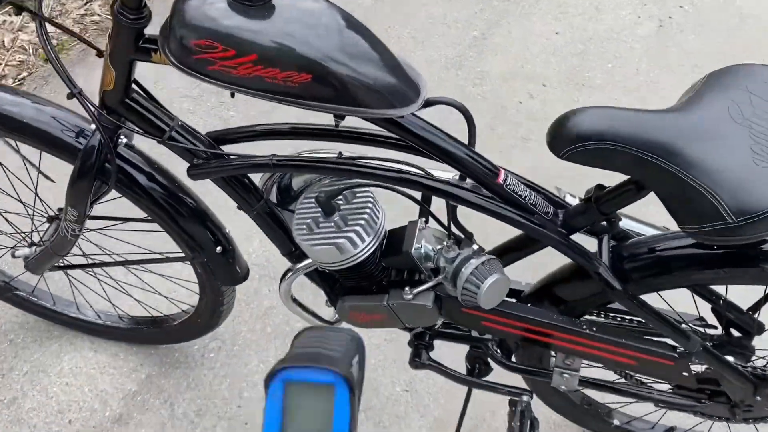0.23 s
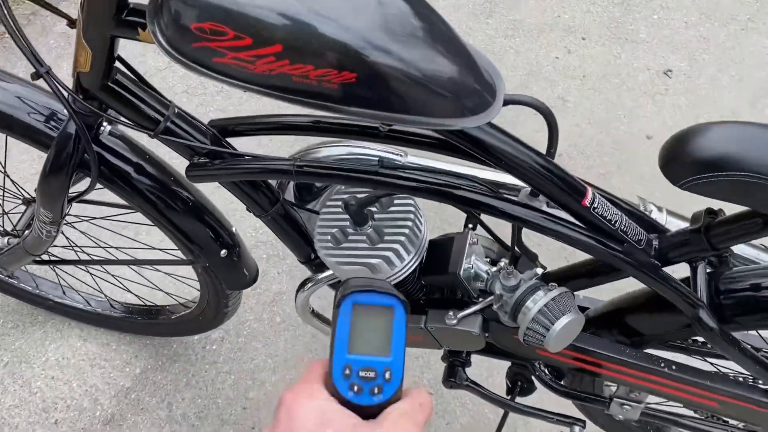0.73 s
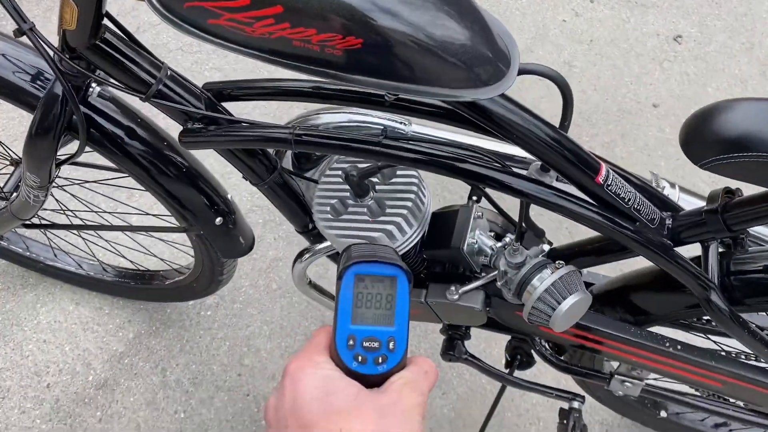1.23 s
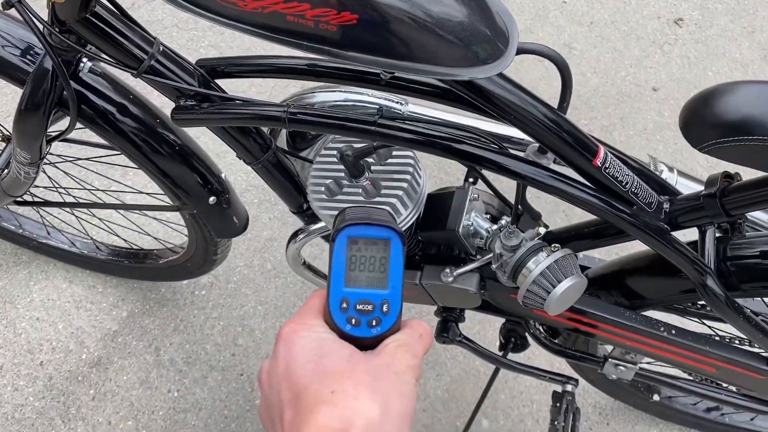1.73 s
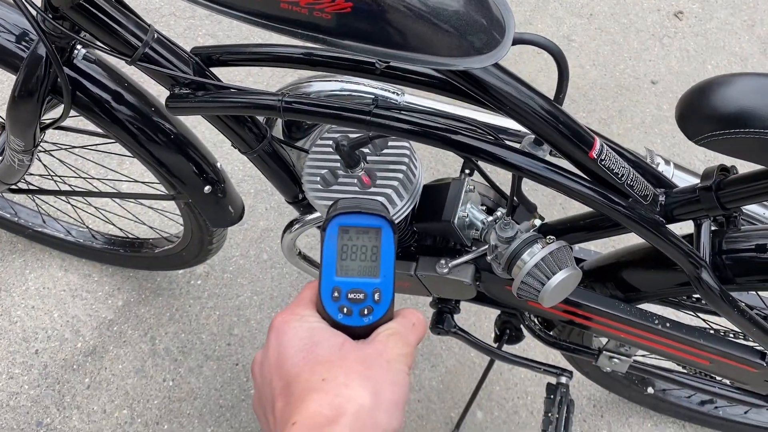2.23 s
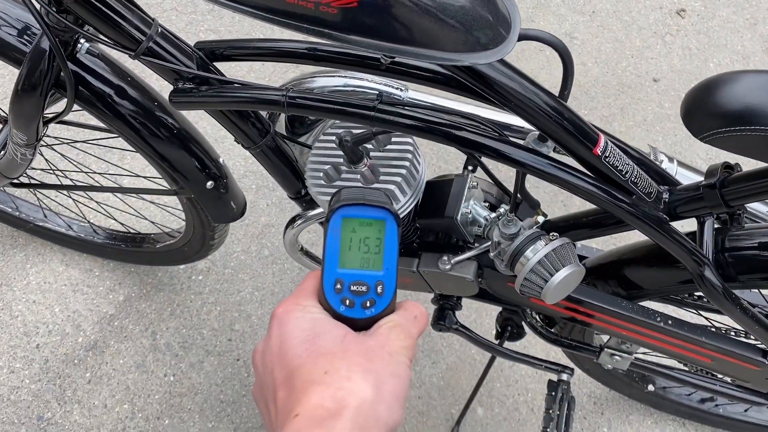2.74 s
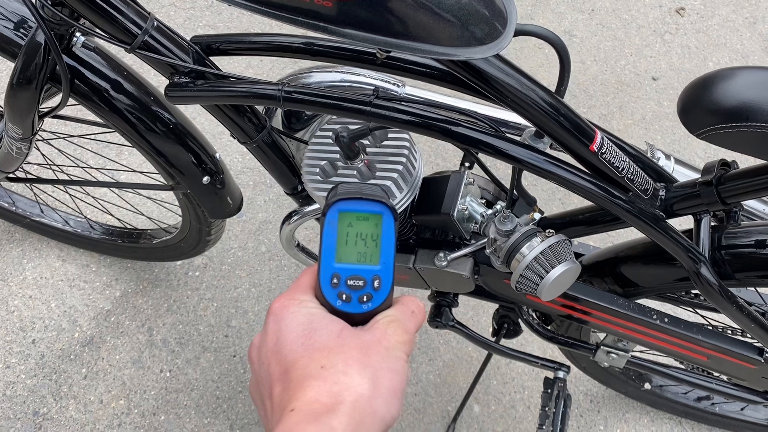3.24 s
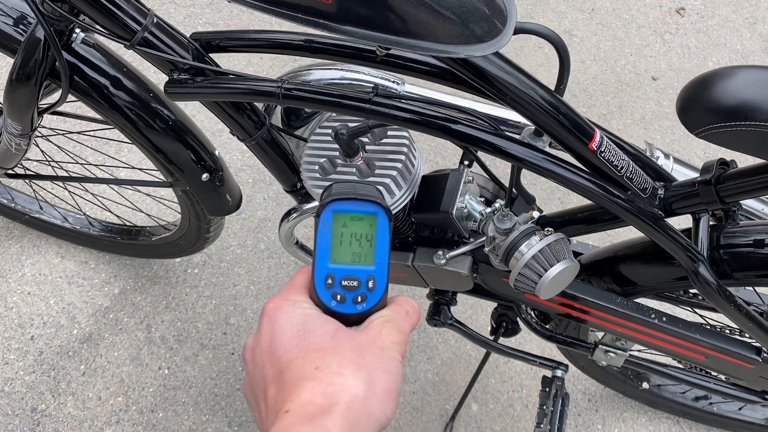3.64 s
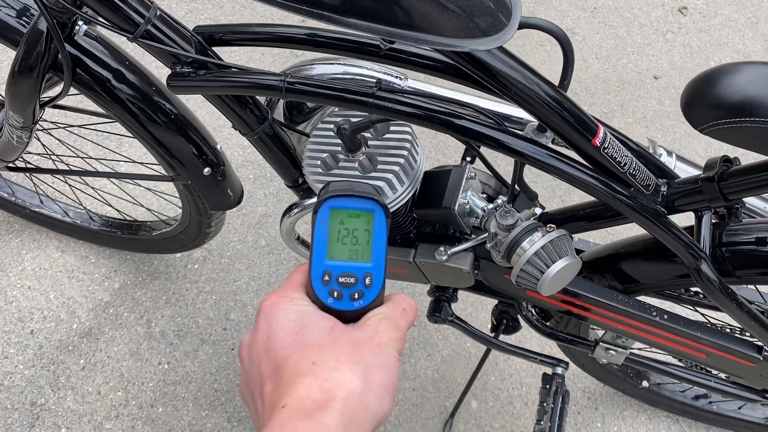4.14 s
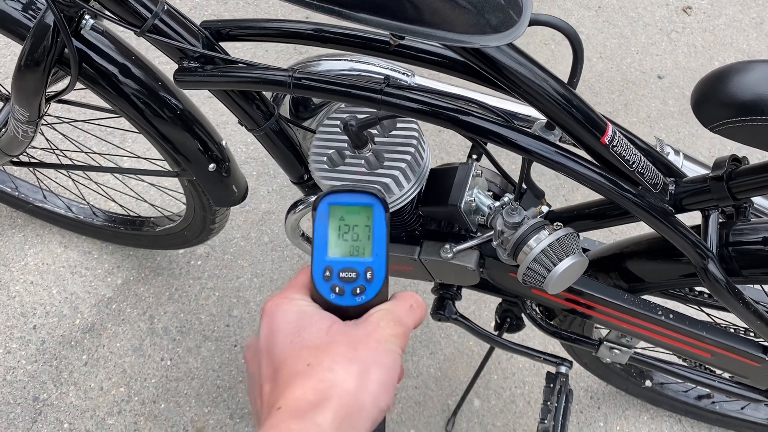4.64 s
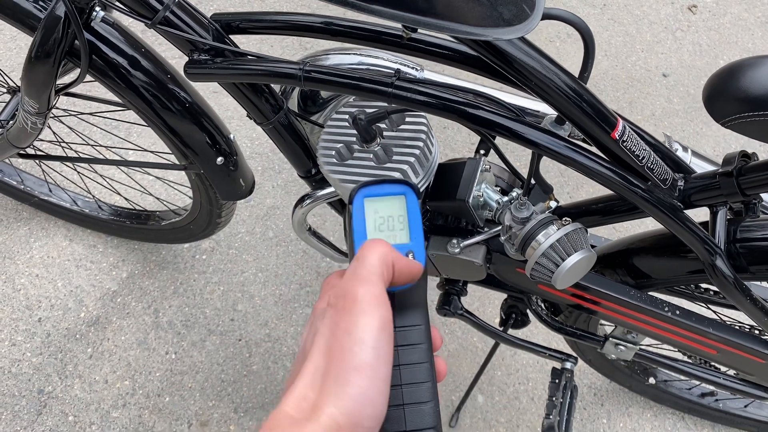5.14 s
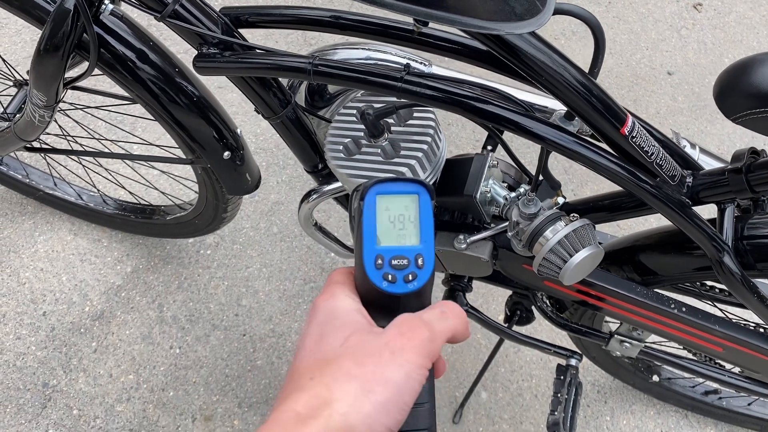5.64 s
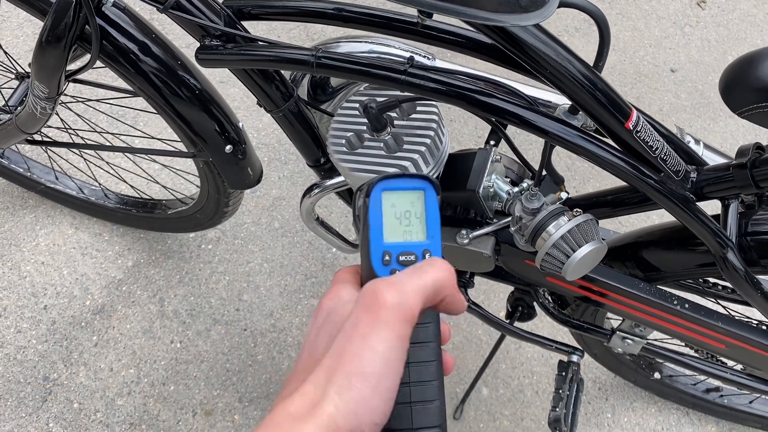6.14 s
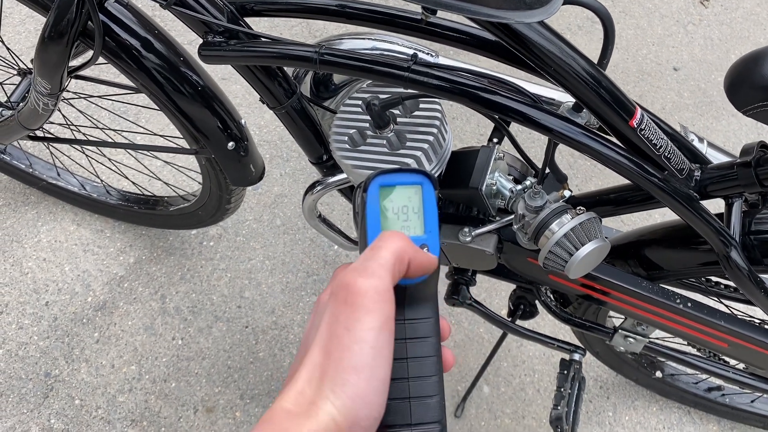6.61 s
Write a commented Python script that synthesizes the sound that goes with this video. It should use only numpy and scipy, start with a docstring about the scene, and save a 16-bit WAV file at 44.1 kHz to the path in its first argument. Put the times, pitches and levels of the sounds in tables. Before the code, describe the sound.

A small two-stroke bicycle engine idles close by outdoors, with a rapid pulsing beat, sputtering exhaust pops and metallic rattle.

```python
"""On a concrete drive, a small two-stroke bicycle engine idles about a metre away.
The crank turns some 52 times a second, but the cylinder fires in bursts, mostly of two to four,
then coasts. Every turn pumps air through the resonant muffler and intake and rattles the finned barrel.
A firing also knocks, cracks out of the exhaust port, rings the pipe and hisses.
A thin panel hums now and then, and nearby surfaces return brief reflections."""
import sys
import numpy as np
from scipy import signal
from scipy.fft import rfft, irfft
from scipy.io import wavfile
from scipy.ndimage import uniform_filter1d

SR = 44100
rng = np.random.default_rng(int(sys.argv[2]) if len(sys.argv) > 2 else 0)


def put_to_file(sound):
    """Save the sound as 16-bit audio at rate SR, in the file named by the first command-line argument."""
    columns = np.atleast_2d(sound).T  # one column per channel
    safe = np.clip(columns, -1, 1)
    whole_steps = np.round(safe * 32767)
    wavfile.write(sys.argv[1], SR, whole_steps.astype(np.int16))


N = 302967
HZ = np.fft.rfftfreq(N, 1 / SR)


def firings(slow_turn_s=.02, quick_turn_s=.0188, falloff_db=12):
    """Intermittent combustion: each burst builds to a crest, which kicks the crank faster, then fades."""
    # Bursts of firings on successive turns. Each row: start in seconds, number of firings,
    # crest in turns after the first firing, relative level of the strongest pop in dB.
    bursts = [(.021, 5, 1.3, -2.8), (0.154, 4, 0.51, -4), (0.2887, 4, 1.3, -2), (0.4417, 3, 1.03, 0),
              (.592, 3, .6, -1), (0.705, 3, 1.8, 0.2), (.859, 3, 1.03, -0.2), (.991, 4, 0.95, -1),
              (1.122, 3, 1.2, -0.6), (1.255, 2, 0.7, -0.5), (1.386, 3, 0.64, -0.9), (1.517, 2, 0.54, -2),
              (1.6495, 3, 0.28, 0.5), (1.78, 2, 0.74, -1), (1.893, 2, 1.2, -0.1), (2.026, 4, 0.38, -0.7),
              (2.156, 4, 1.15, 0), (2.305, 2, 0.66, -1.5), (2.4187, 3, 1.67, .1), (2.593, 2, 0.12, 1),
              (2.7075, 2, 0.84, .1), (2.8465, 2, 0.6, -0.5), (2.966, 2, 0.77, -1), (3.0445, 4, 1.4, -3.5),
              (3.1818, 3, 0.5, -1.5), (3.296, 3, 1.65, -.5), (3.4502, 2, 0.75, -0.5), (3.566, 2, 0.8, 0),
              (3.701, 2, 0.73, 0.7), (3.8166, 4, 1.25, -0.5), (3.966, 2, 1.2, 0.5), (4.08, 2, 0.85, 1),
              (4.2131, 2, 0.62, -0.5), (4.3257, 5, .95, -0.6), (4.457, 3, 1.53, -1.5),
              (4.6095, 2, 0.73, .5), (4.723, 3, 1.25, -0.5), (4.855, 2, 1.2, 1), (4.986, 2, 1.2, 1.5),
              (5.1171, 2, 0.84, 1), (5.2315, 3, 1.9, -0.2), (5.3662, 4, 1.08, 0), (5.5003, 3, 1.45, -0.7),
              (5.633, 3, 1.7, .5), (5.7881, 4, -.3, 1), (5.9217, 2, 1.5, -0.5), (6.0389, 3, 1.05, 0.1),
              (6.174, 2, 0.78, .5), (6.2906, 3, 0.77, .5), (6.408, 4, 1.4, -1.5), (6.5422, 2, 0.89, 1),
              (6.657, 3, 0.9, 0.5), (6.7924, 1, 3, 1.5)]
    rows = []
    for start, count, crest, top_db in bursts:
        past_crest = np.arange(count) - crest
        turn_s = np.interp(past_crest, [-.7, 0], [slow_turn_s, quick_turn_s])
        reach = np.where(past_crest < 0, .9, .35 * count)  # turns from the crest to half weakness
        weakness = past_crest ** 2 / (past_crest ** 2 + reach ** 2)
        pop_db = top_db - falloff_db * (weakness - weakness.min())
        # the knock grows faster than the pop, and is softer after the crest
        knock_db = -2.1 + 1.53 * pop_db - 4.5 * np.clip(past_crest, 0, 1)
        rows.append([start + np.cumsum(turn_s) - turn_s, pop_db, knock_db])
    return np.hstack(rows)


def crank(fired, turn_s=.019):
    """Coasting on inertia: the turns come quickly just after a burst and slow until the next."""
    marks = np.r_[fired[0] - 3 * turn_s, fired, fired[-1] + 4 * turn_s]
    turns = []
    for start, end in zip(marks[:-1], marks[1:]):
        count = max(1, round((end - start) / turn_s))
        share = np.linspace(0, 1, count, endpoint=False)
        turns.extend(start + (end - start) * (share - .055 * share * (1 - share)))
    return np.array(turns)


def exhaust(fired, pop_db):
    """Pipe resonance: a pressure front, steeper when strong, rings the modes; the bulk of gas follows."""
    # Modes of the pipe, of the port and header, and of the slow slug of gas leaving the muffler.
    # Each row: frequency in Hz, bandwidth in Hz, gain in dB, polarity.
    pipe_modes = [(423, 68, -19.5, -1), (762, 10, -32.5, -1), (856.4, 31.4, -11.5, 1), (924, 24, -24.5, 1),
                  (1224, 11.5, -27.5, 1), (1409, 72, -16, 1), (1677, 19, -24, 1), (1800, 100, -32, 1)]
    port_modes = [(634, 38, -25, -1), (2500, 88, -20, 1), (3160, 220, -16, 1)]
    slug_modes = [(74, 9.5, -26.5, 1), (102.8, 29.6, -21.5, 1), (130, 110, -26.5, 1)]
    pop = ring(fired, pop_db, pipe_modes, detune=.015, scatter_db=2, sag=.06)
    crack = ring(fired, 1.9 * pop_db, port_modes, detune=.0076, scatter_db=3, size=1200)
    half_turn_later = fired + .0105
    thump = ring(half_turn_later, .6 * pop_db, slug_modes, detune=.015, scatter_db=1, size=5000)
    return pop + crack + thump


def pumping(turns):
    """Cavity resonance: fired or not, the piston puffs into the muffler, then gulps at the intake."""
    # Modes of the two cavities. Each row: frequency in Hz, bandwidth in Hz, gain in dB, polarity.
    muffler_modes = [(49.4, 21.4, -28.5, -1), (386.7, 76, -13.5, 1), (422.9, 53.2, -14.5, -1),
                     (514, 66, -33.5, 1), (852.5, 25, -33, 1), (1370, 45, -54, 1), (1740, 28, -37, 1)]
    intake_modes = [(102.3, 25, -27, 1), (161, 29, -40.5, 1), (198.8, 10.4, -37.5, 1),
                    (206, 24.5, -38.5, 1), (225, 49, -45.5, 1), (348, 9.3, -38.5, 1)]
    puff = ring(turns + .00091, 0, muffler_modes, detune=.017, scatter_db=1.4)
    gulp = ring(turns + .0072, 0, intake_modes, detune=.0055, scatter_db=2, size=5000)
    return puff + gulp


def clatter(turns):
    """Impact noise: rings, bearings and gear teeth tick, hardest as the piston rocks over at the top."""
    # Spectrum of the impacts. Each row: frequency in Hz, relative level in dB.
    spectrum = [(30, -9), (70, 11.5), (250, 3), (560, -1.5), (950, 4.5), (1600, 1), (2300, -3),
                (3400, -3.5), (4400, -6.5), (5200, -11), (7000, -10), (8200, -9), (11000, -12.5),
                (16000, -19)]
    revolutions = np.interp(np.arange(N) / SR, turns, np.arange(len(turns)))
    slap = undb(5.4 * rng.standard_normal(len(turns)))[revolutions.astype(int)]  # no two turns alike
    rocking = np.exp(.69 * (np.cos(2 * np.pi * (revolutions - .68)) - 1))
    load = 1 + .28 * slap * rocking
    ticks = rng.standard_normal(N) * (rng.random(N) < .25)
    ticks *= undb(1.57 * rng.exponential(size=N))
    return undb(-27) * barrel(load * ticks, spectrum)


def hiss(fired, knock_db, size=2400):
    """Impact and turbulence: combustion knocks on the barrel, then gas tears through the opening port."""
    # Envelope of the gas noise. Each row: time from the port opening in seconds, relative level in dB.
    blow = [(-.009, -35), (-.0065, -13.5), (-.002, -2), (0, -7), (.0035, -3), (.007, -9.5), (.013, -19),
            (.026, -21), (.04, -54)]
    # Spectrum of the gas noise. Each row: frequency in Hz, relative level in dB.
    spectrum = [(200, -3), (560, -4.5), (900, 2.5), (1700, 1.5), (2200, 1), (3300, 1), (4400, -2.5),
                (5200, -4.5), (6400, -6), (8200, -5.5), (11500, -7), (16000, -16.5)]
    seconds, db = np.transpose(blow)
    envelope = undb(np.interp(seconds[0] + np.arange(size) / SR, seconds, db))
    strength = place(fired + seconds[0], np.outer(undb(knock_db), envelope))
    gas = rng.standard_normal(N)
    flicker_db = 1.46 * np.repeat(rng.standard_normal(N // 16 + 1), 16)[:N]
    return undb(-29) * barrel(strength * gas * undb(flicker_db), spectrum)


def barrel(force, spectrum):
    """Structural radiation: the metal gives a broad spectrum with the fins ringing on top, at unit rms."""
    # Modes of the cooling fins and covers. Each row: frequency in Hz, bandwidth in Hz, gain in dB.
    fin_modes = [(1383, 95, 0.5), (1718, 31, 7.5), (2786, 18, 8), (3213, 11.5, 10), (3252, 24, 1),
                 (3398, 21, 8), (3500, 32, 5.5), (4030, 71, 4), (4494, 230, 2.5), (5470, 170, 5.5),
                 (6000, 120, -1), (6300, 100, 3), (6800, 34, 9.5)]
    fins = sum(undb(db) * 1j * HZ * width / (hz ** 2 - HZ ** 2 + 1j * HZ * width)
               for hz, width, db in fin_modes)
    radiated = irfft(rfft(force) * colour(spectrum) * (1 + undb(-1) * fins), N)
    return radiated / np.sqrt(np.mean(radiated ** 2))


def panel_hum(turns):
    """Forced vibration: a thin panel swells into resonance at four times the crank speed."""
    # Swells of the hum. Each row: time in seconds, rms level in dB.
    swells = [(0, -48.5), (2.6, -51), (2.85, -38), (3.15, -34), (3.35, -47.5), (5.9, -49), (6.1, -40),
              (6.4, -49), (6.6, -42)]
    t = np.arange(N) / SR
    revolutions = uniform_filter1d(np.interp(t, turns, np.arange(len(turns))), size=4000)
    amplitude = np.sqrt(2) * undb(np.interp(t, *np.transpose(swells)))
    return amplitude * np.sin(2 * np.pi * 4 * revolutions)


def reflections(sound, decay_s, size=3000):
    """Scattering: frame, tank and concrete smear the sound in time and leave its spectrum unchanged."""
    decay = undb(-60 * np.arange(size) / SR / decay_s)
    spray = rfft(rng.standard_normal(size) * decay, N)
    return irfft(rfft(sound) * spray / np.abs(spray), N)


def ring(times, db, modes, detune, scatter_db, sag=0, size=3600):
    """Modal superposition: each pulse rings damped modes, which gas temperature detunes together."""
    t, pulses = np.arange(size) / SR, 0
    chance = rng.standard_normal((len(times), len(modes) + 1))
    # with sag, a strong pulse starts flat and glides up as hot gas fills the pipe
    lag = sag * np.outer(undb(db), .0051 * (1 - np.exp(-t / .0045)))
    clock = np.outer(1 + detune * chance[:, -1], t) - lag
    for k, (hz, width, mode_db, polarity) in enumerate(modes):
        gain = polarity * undb(db + mode_db + scatter_db * chance[:, k])
        envelope = np.outer(gain, np.exp(-np.pi * width * t))
        pulses = pulses + envelope * np.cos(2 * np.pi * hz * clock)
    return place(times, pulses)


def place(times, sounds):
    """Linear superposition: one short sound starts at each time, and overlaps add."""
    track = np.zeros(N + 2 * SR)
    for seconds, sound in zip(times, sounds):
        start = SR + int(round(seconds * SR))
        track[start:start + len(sound)] += sound
    return track[SR:SR + N]


def colour(points):
    """Frequency response: the gain through (Hz, dB) points on a logarithmic frequency axis."""
    hz, db = np.transpose(points)
    return undb(np.interp(np.log(HZ + 1), np.log(hz), db))


def undb(db):
    """Amplitude ratio of a level in decibels."""
    return 10 ** (np.asarray(db) / 20)


def scene():
    """Source extent: pipe and intake sound from their openings; the metal radiates all over, so is wider."""
    # Stereo width. Each row: frequency in Hz, gain of the side signal in dB.
    width = [(60, -28), (300, -18.5), (750, -9), (1300, -8.5), (3000, -6.5), (6500, -4), (8500, -47),
             (16000, -13)]
    fired, pop_db, knock_db = firings()
    turns = crank(fired)
    tones = pumping(turns) + exhaust(fired, pop_db) + panel_hum(turns)
    facing, flanks = (hiss(fired, knock_db) + clatter(turns) for _ in range(2))
    indirect = reflections(tones, decay_s=.049) + flanks
    side = irfft(rfft(indirect) * colour(width), N)
    return tones + facing + np.array([side, -side])


def record(dry, bottom_hz=40, top_hz=16000):
    """Stereo image: left and right differ in level and phase, with opposite polarity near 9 and 13 kHz."""
    # Stereo balance. Each row: frequency in Hz, left minus right level in dB.
    balance = [(60, 2), (200, -1), (400, 0), (750, 1), (1300, 1.5), (2400, 3.5), (4400, 2), (8000, 0.7),
               (15000, -0.5)]
    # Phase between the channels. Each row: frequency in Hz, lead of the left channel in radians.
    phase = [(0, 0), (100, -.25), (750, -.55), (1700, -.4), (3500, .6), (5400, .4), (7500, 0), (8600, -2.8),
             (9400, -3.4), (10300, -6), (11900, -6.5), (12800, -9.1), (13600, -9.7), (14600, -12.5)]
    lead = np.interp(HZ, *np.transpose(phase))
    tilt = np.sqrt(colour(balance)) * np.exp(.5j * lead)  # each channel takes half
    bass_cut = 1 / np.sqrt(1 + (bottom_hz / (HZ + 1)) ** 10)
    heard = irfft(rfft(dry) * bass_cut * np.array([tilt, 1 / tilt]), N)
    rounded = np.tanh(.8 * heard) / .8  # softens the loudest peaks
    treble_cut = signal.ellip(10, .2, 80, top_hz, fs=SR, output="sos")
    return signal.sosfilt(treble_cut, rounded)


dry = scene()
out = record(dry)
put_to_file(out)
```